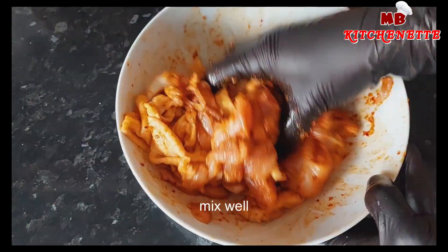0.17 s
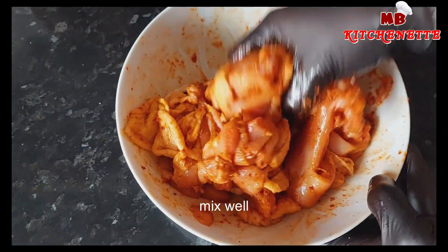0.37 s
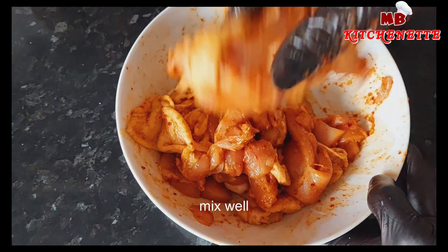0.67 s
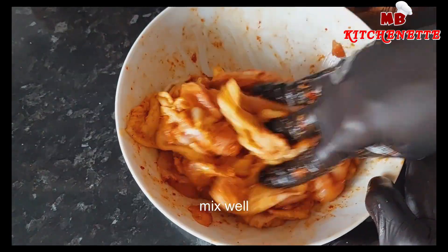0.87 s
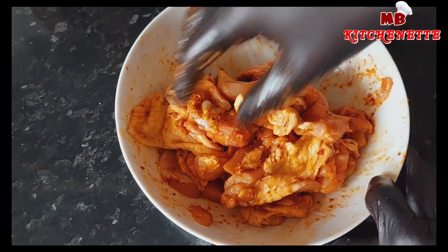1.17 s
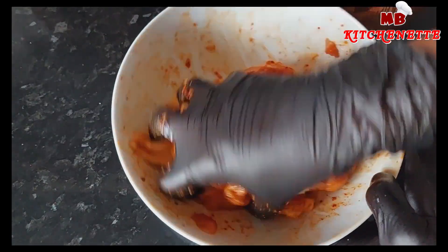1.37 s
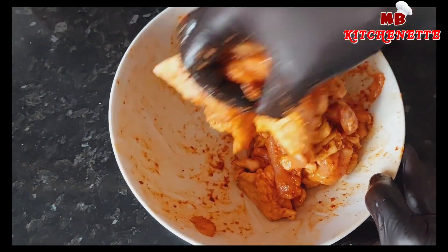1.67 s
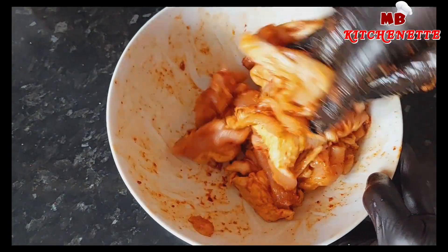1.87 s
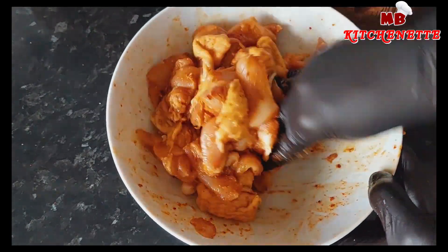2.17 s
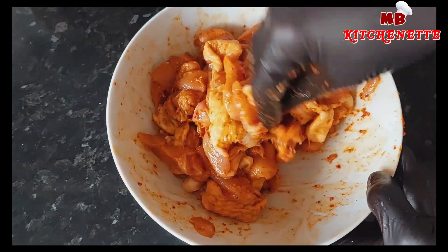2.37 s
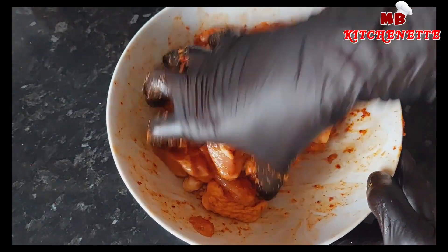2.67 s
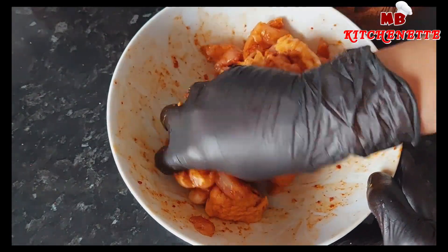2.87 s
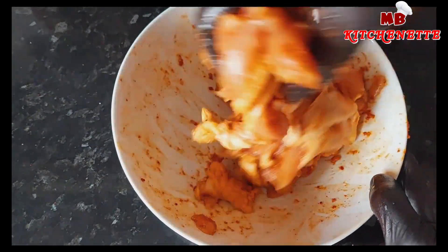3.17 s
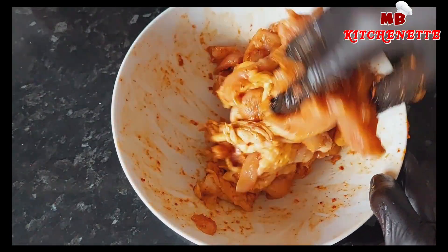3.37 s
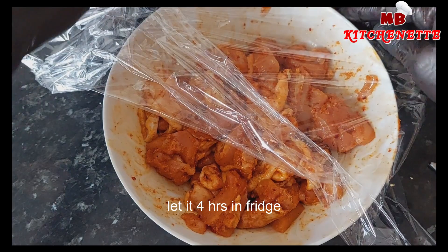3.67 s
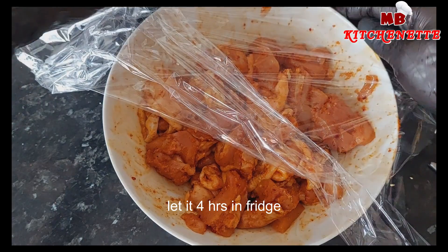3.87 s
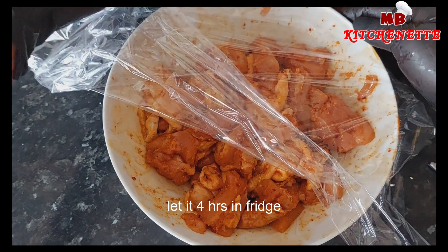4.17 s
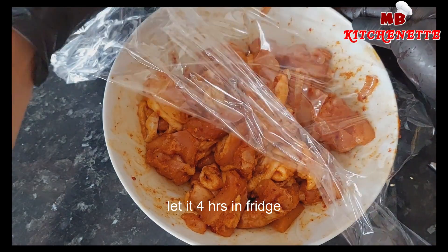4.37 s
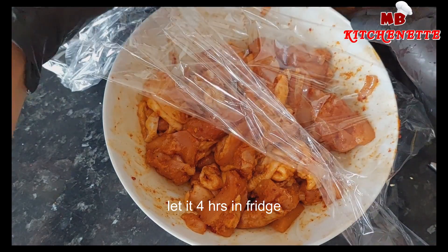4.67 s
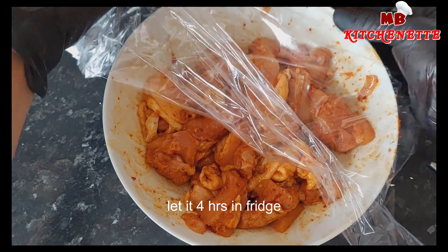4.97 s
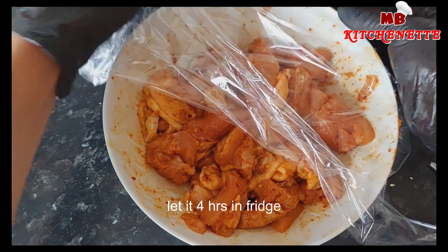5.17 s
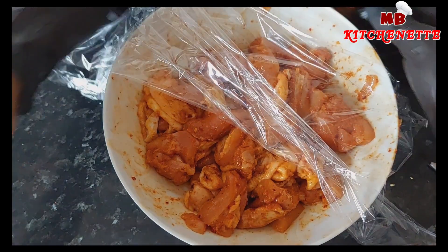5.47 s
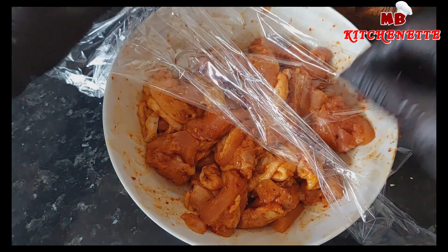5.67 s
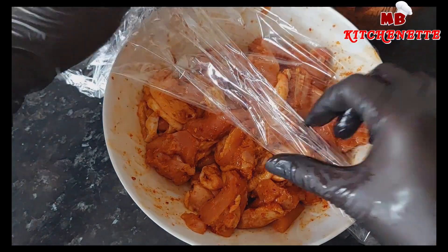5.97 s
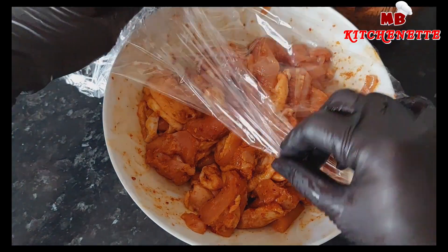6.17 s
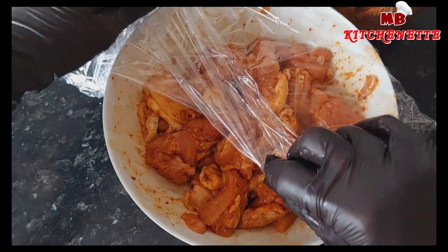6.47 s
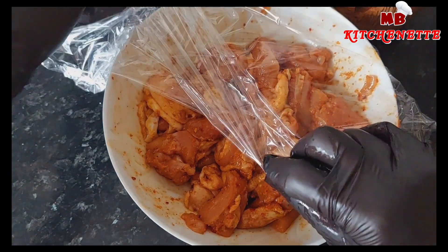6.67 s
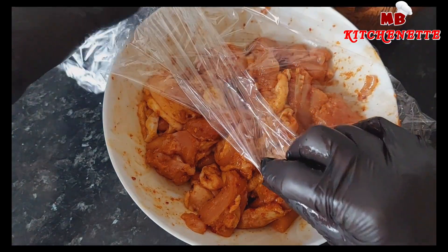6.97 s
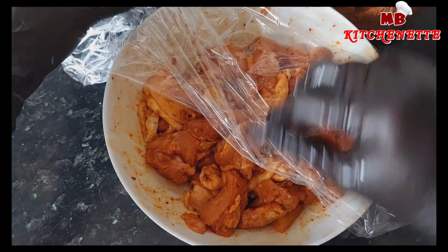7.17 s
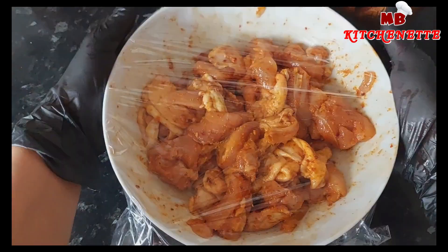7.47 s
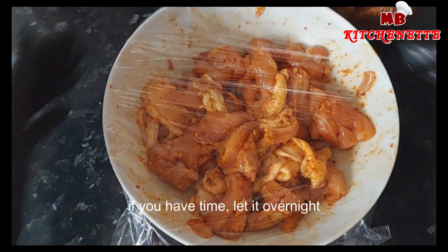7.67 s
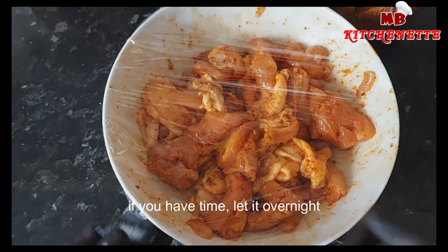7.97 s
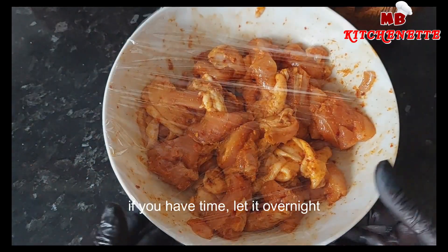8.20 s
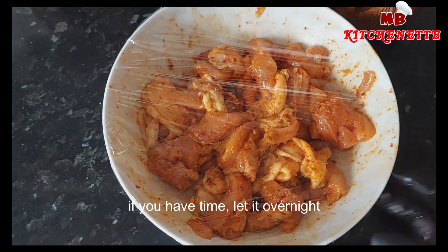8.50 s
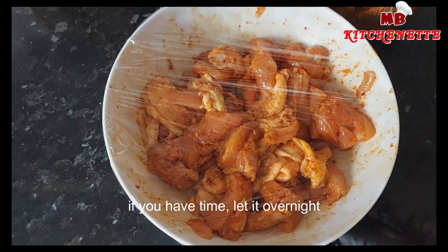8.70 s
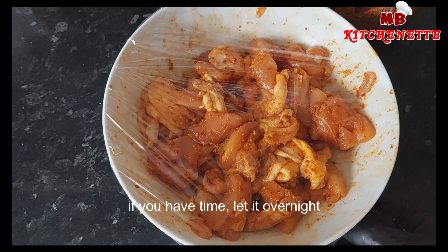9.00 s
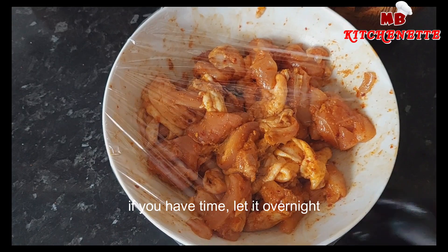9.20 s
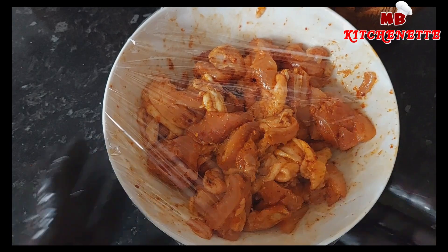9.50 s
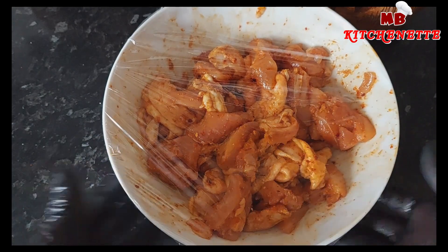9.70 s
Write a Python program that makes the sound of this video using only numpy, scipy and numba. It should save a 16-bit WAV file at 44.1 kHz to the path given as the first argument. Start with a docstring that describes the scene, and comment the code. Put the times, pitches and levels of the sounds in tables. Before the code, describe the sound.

Close stereo pickup in a small, quiet kitchen. First, sticky meat is kneaded in short irregular squishes, with fizzing marinade, popping air pockets and dull knocks ringing the bowl. The wet sound stops suddenly and plastic film takes over: faint creaks, bursts of brittle crackle, loud snaps, then smoother hissing rubs with a hollow, drum-like edge and a few muffled bowl bumps over low background noise.

```python
"""Gloved hands squish marinated chicken in a ceramic bowl: torn noise and tiny rings fizz, moving band-passes
squelch, pockets pop, and struck bowl modes with a filtered splat thud as the meat drops back in.
After a cut to a second shot, cling film is pulled over the bowl and smoothed down: noise bursts crinkle,
larger creases snap, and resonances that follow the tension make the taut sheet answer like a small drum.
A close stereo microphone hears it in a quiet, hard-walled kitchen, over low room noise and hiss."""
import sys
import numpy as np
from scipy import signal
from scipy.fft import rfft, irfft, next_fast_len
from scipy.io import wavfile
from scipy.ndimage import uniform_filter1d
from numba import njit

SR = 44100
rng = np.random.default_rng(int(sys.argv[2]) if len(sys.argv) > 2 else 0)


def output_pcm(signal):
    """Save a mono or channel-first signal as 16-bit PCM at the path in sys.argv[1].

    Samples are clipped to [-1, 1] before scaling.
    """
    pcm = np.clip(np.atleast_2d(signal).T, -1, 1) * 32767
    wavfile.write(sys.argv[1], SR, np.round(pcm).astype(np.int16))


N = 433944

CUT_S = 3.47  # the cut from the meat shot to the film shot is complete
# How fast the sound settles once the hand stops, in dB per second.
MEAT_RELEASE_DB_PER_S, FILM_RELEASE_DB_PER_S, BOWL_RELEASE_DB_PER_S = 202.5, 177, 98.5
FILM_REST_DB = -77  # the stretched film creeps faintly between pulls
BODY_GROWS = 1.4  # exponent: pockets and sheet swell and fade faster than the treble
TOP_HZ = 16100  # band limit of the recorder


def amp(db):
    """Decibels to gain."""
    return 10 ** (np.asarray(db) / 20)


def unit(x):
    """Scale to rms 1."""
    return x / np.sqrt(np.mean(x ** 2) + 1e-20)


def along(points, hz):
    """Read (Hz, value) points on a log frequency axis."""
    point_hz, value = np.transpose(points)
    return np.interp(np.log(hz + 1), np.log(point_hz + 1), value)


def filtered(x, response):
    """Multiply the spectrum of x by a response of frequency."""
    n = x.shape[-1]
    padded = next_fast_len(n + 8192)
    hz = np.fft.rfftfreq(padded, 1 / SR)
    return irfft(rfft(x, padded) * response(hz), padded)[..., :n]


def coloured(x, spectrum):
    """Shape x with a spectrum in dB, at rms 1."""
    return unit(filtered(x, lambda hz: amp(along(spectrum, hz))))


def noise(side_db, size=N):
    """White stereo noise; the side level sets how wide it is."""
    mid, side = rng.standard_normal((2, size)) * amp([[0], [side_db]])
    return unit(np.array([mid + side, mid - side]))


def add(track, s, sound):
    """Mix a sound into the track at s seconds."""
    part = track[:, round(s * SR):][:, :sound.shape[-1]]
    part += sound[..., :part.shape[-1]]


def ring(modes, t, scatter):
    """Struck modes decay; each reaches the two ports with its own strength and phase."""
    total = 0
    for hz, db, t60 in modes:
        level = amp(db + rng.normal(0, 1.5, (2, 1)) - 60 * t / t60)
        phase = rng.uniform(0, 2 * np.pi) + rng.normal(0, scatter, (2, 1))
        total = total + level * np.sin(2 * np.pi * hz * t + phase)
    return total


def bursts(rate, life, spread_db):
    """Level of a crackle: abrupt bursts that die at once, a few large among many small; even on average."""
    when, strength = rng.random((int(rate * N / SR), 2)).T
    energy = amp(spread_db * np.minimum(-np.log(1 - strength), 4)) ** 2
    impulses = np.bincount((when * N).astype(int), energy, N)
    power = signal.lfilter([1], [1, -np.exp(-2 / (life * SR))], impulses)
    average = np.abs(uniform_filter1d(power, SR // 25))
    return np.sqrt(power / (average + 1e-3))


def bubbles(rate, low_hz, high_hz, life, spread_db, size):
    """Tiny cavities ring as they open, each with its own path to the two ports."""
    when, pitch, strength = rng.random((int(rate * N / SR), 3)).T[:, :, None]
    hz = low_hz * (high_hz / low_hz) ** pitch
    height = amp(spread_db * np.minimum(-np.log(1 - strength), 4))
    index = ((when * N).astype(int) + np.arange(size)).ravel()
    ports = []
    for _ in range(2):
        delay_s = .0004 * rng.random(hz.shape)
        age = np.maximum(np.arange(size) / SR - delay_s, 0)
        waves = height * np.exp(-age / life) * np.sin(2 * np.pi * hz * age)
        ports.append(np.bincount(index, waves.ravel(), N)[:N])
    return unit(np.array(ports))


def patchy(x, depth_db, size, count):
    """Each spot has its own colour: random gain smoothed over size frequency bins and count frames."""
    z = signal.stft(x, nperseg=256)[2]
    field = uniform_filter1d(rng.standard_normal(z.shape[1:]), size, 0)
    field = uniform_filter1d(field, count, 1)
    return signal.istft(z * amp(depth_db * unit(field)), nperseg=256)[1][:, :N]


@njit
def resonate(x, hz, q):
    """A stereo band-pass whose centre moves."""
    out = np.zeros_like(x)
    step = 2 * np.sin(np.pi * hz / SR)
    for port in range(2):
        low = band = 0.0
        for i in range(x.shape[1]):
            low += step[i] * band
            band += step[i] * (x[port, i] - low - band / q)
            out[port, i] = band / q
    return out


def stroke(start, rise, hold, release_db_per_s):
    """Effort of one hand movement: it builds up, holds and dies away."""
    t = np.arange(N) / SR - start
    build = np.clip(t / max(rise, 1e-3), 0, 1)
    return build * amp(-np.clip((t - rise - hold) * release_db_per_s, 0, 120))


def handling(strokes, release_db_per_s, rest, uneven_db, catches_per_s, slip_s):
    """Gains of treble and body over all strokes; at random the fingers catch: the effort jumps and slips away."""
    treble, body = rest ** 2, 0  # powers
    for start, rise, hold, db, body_db, *_ in strokes:
        effort = stroke(start, rise, hold, release_db_per_s)
        treble = treble + (amp(db) * effort) ** 2
        body = body + (amp(db + body_db) * effort ** BODY_GROWS) ** 2
    catches = rng.random(N) < catches_per_s / SR
    grip = signal.lfilter([1], [1, -np.exp(-1 / (slip_s * SR))], catches * 1.0)
    unevenness = amp(uneven_db * np.minimum(unit(grip - grip.mean()), 3))
    return np.sqrt([treble, body]) * unevenness


def film_shot():
    """0 during the meat shot, 1 during the film shot, with a 20 ms crossing at the cut."""
    return np.clip((np.arange(N) / SR - CUT_S) / .02 + 1, 0, 1)


def kitchen(x, wet_db):
    """The direct sound plus the hard walls' answer, in which treble dies first."""
    # Decay of the room. Each row: frequency in Hz, t60 in seconds.
    room_decay = [(100, 0.35), (500, 0.44), (1500, 0.36), (5000, 0.16), (14000, 0.13)]
    hz, t, z = signal.stft(noise(-4.5, size=SR * 2 // 3), SR, nperseg=256)
    decay = amp(-60 * t / along(room_decay, hz)[:, None])
    build = 1 - np.exp(-t / 0.0018)
    tail = signal.istft(z * decay * build, SR, nperseg=256)[1]
    tail = tail / np.linalg.norm(tail[0])
    return x + amp(wet_db) * signal.fftconvolve(x, tail, axes=1)[:, :N]


def background():
    """Low room noise and microphone hiss, each steady noise of one colour."""
    # Colour of the room noise. Each row: frequency in Hz, relative level in dB.
    air_colour = [(21, -28.5), (35, 4), (124, 3), (200, -9), (260, -2.5), (600, -5.5), (700, -13.5),
                  (1400, -24), (2400, -70.5)]
    # Colour of the microphone hiss. Each row: frequency in Hz, relative level in dB.
    hiss_colour = [(1000, -10), (2000, -3), (3600, -12.5), (5500, -3), (9000, 0), (16000, 0)]
    air = amp(-66.5) * coloured(noise(-2.5), air_colour)
    return air + amp(-70.0) * coloured(noise(-1), hiss_colour)


def shifting():
    """The bowl rumbles faintly as the film is tucked under it; once a puff of air thumps the left port."""
    # The bowl shifts on the counter.
    # Each row: start in seconds, rise in seconds, hold in seconds, rumble level in dB.
    bowl_moves = [(7.399, 0.045, 0.14, -64), (7.57, 0.012, 0.033, -56.5), (7.979, 0.01, .02, -47.5),
                  (8.04, 0.018, 0.064, -60), (8.4, 0.092, 0.39, -63), (9.041, 0.097, 0.77, -66.5)]
    # Colour of the rumble. Each row: frequency in Hz, relative level in dB.
    rumble_colour = [(25, -4), (48, -4.5), (100, -1), (180, -10.5), (400, -15), (900, -47.5)]
    power = 0
    for start, rise, hold, db in bowl_moves:
        power = power + (amp(db) * stroke(start, rise, hold, BOWL_RELEASE_DB_PER_S)) ** 2
    rumble = np.sqrt(power) * coloured(noise(0), rumble_colour)
    t = np.arange(N) / SR - 7.605  # seconds from the middle of the puff
    puff = amp(-38) * np.exp(-np.abs(t) / 0.015) * np.sin(2 * np.pi * 62 * t)
    return rumble + puff * np.array([[1], [0]])


def crinkling():
    """Slack film buckles in small creases, taut film mostly hisses under the gloves; the sheet adds a hollow body."""
    # The hands pull, tuck or smooth the film. Each row: start in seconds, rise in seconds,
    # hold in seconds, crinkle level in dB, taut sheet in dB relative to the crinkle.
    film_moves = [(3.53, 0.035, 0.11, -65.5, -4.5), (3.68, 0.05, 0.63, -71, -10),
                  (4.12, 0.012, 0.21, -54, -6.5), (4.2, 0.03, 0, -49, -5), (4.4, 0.057, 0, -60, -11.5),
                  (4.722, 0.012, 0.03, -56.5, -3), (4.82, 0.033, 0.3, -61, -8.5),
                  (5.04, 0.046, .025, -44.5, -5), (5.13, 0.013, 0.04, -49.5, 1),
                  (5.21, 0.034, 0.11, -56, -3), (5.36, 0.026, .11, -66.5, -7.5),
                  (5.71, 0.061, 0.033, -58, -9), (6.005, 0.032, .07, -50, -9.5),
                  (6.11, 0.081, .05, -46.5, -6.5), (6.235, 0.015, 0, -42, -6.5),
                  (6.35, .03, .08, -62.5, -9), (6.48, .02, 0.092, -60, -4), (6.75, 0.027, .03, -62, -11.5),
                  (6.87, 0.022, 0.11, -61.5, -15), (6.97, 0.061, 0.055, -48, -7.5),
                  (7.16, 0.013, 0, -58.5, -4), (7.41, 0.022, 0.14, -55, -10.5),
                  (7.91, 0.075, 0.22, -55.5, -4.5), (8.04, 0.019, .06, -47.5, -6),
                  (8.25, 0.025, 0, -51, -2.5), (8.51, 0.046, .05, -58, -13.5),
                  (8.62, 0.035, 0.16, -50.5, -4), (8.88, 0.078, .06, -55, -5),
                  (9.04, 0.0295, 0.067, -65, -4), (9.16, 0.01, 0, -55, -6.5), (9.43, 0.1, 0.18, -49, -9.5)]
    # The film is pulled tight, so creases give way to smooth sliding.
    # Each row: time in seconds, share of the sound's power made by creases (0-1).
    slack_curve = [(6.9, .8), (7.5, .4)]
    # The film's resonance follows how tight it is pulled. Each row: time in seconds, pitch in Hz.
    tension_curve = [(4.3, 1085), (5.25, 956), (6.25, 1350), (6.55, 940), (7.1, 981), (8.1, 1300),
                     (8.8, 1360)]
    # Colour of the crinkle. Each row: frequency in Hz, relative level in dB.
    crinkle_colour = [(1000, -23), (1800, -7.5), (3300, -4.5), (4100, -1), (6500, -3), (12000, 0),
                      (16000, -2.5)]
    # Colour of the hollow sheet. Each row: frequency in Hz, relative level in dB.
    drum_colour = [(80, -6), (300, -4.5), (680, -6.5), (1400, -9.5), (2600, -11.5), (4500, -21)]
    t = np.arange(N) / SR
    creep = amp(FILM_REST_DB) * film_shot()
    crinkle, sheet = handling(film_moves, FILM_RELEASE_DB_PER_S, creep,
                              uneven_db=1.54, catches_per_s=36, slip_s=0.025)
    slack = np.interp(t, *np.transpose(slack_curve))
    small = bursts(rate=400, life=.0024, spread_db=2.8)
    large = bursts(rate=50, life=.0013, spread_db=2.2)
    creases = unit(np.hypot(small, .95 * large))
    friction = np.sqrt(slack * creases ** 2 + 1 - slack)  # creases and smooth sliding share the power
    bright = patchy(friction * noise(0), 2, size=24, count=2)
    rubbed = friction * noise(-2.2)
    sheet_hz = np.interp(t, *np.transpose(tension_curve))
    hollow = rubbed + amp(8) * resonate(rubbed, sheet_hz, 3)
    treble = amp(0.38) * crinkle * coloured(bright, crinkle_colour)
    return treble + amp(1.35) * sheet * coloured(hollow, drum_colour)


def snaps():
    """A large crease flips with a crack, shakes its neighbours and rings the taut sheet."""
    # Creases snap through. Each row: time in seconds, level in dB, relative level of the sheet's ring in dB.
    crease_snaps = [(4.062, -38, -20.5), (4.145, -25.5, -10), (4.2389, -19, -21), (4.243, -23, -5),
                    (4.305, -21.5, -6.5), (4.333, -28.5, -28), (4.995, -33.5, -15), (5.090, -23.5, -19),
                    (5.099, -24.5, -21), (5.112, -23.5, -18), (5.117, -24, -26), (5.137, -32.5, -18),
                    (5.160, -33.5, 0.5), (5.193, -36.5, 3), (6.13, -35.5, -22), (6.15, -29, -19),
                    (6.162, -27, -10), (6.187, -27.5, -8), (6.248, -14.5, -27), (6.2547, -13, -22),
                    (6.484, -37.5, -7), (7.051, -30.5, -34), (7.934, -39, -14), (8.061, -37, -13),
                    (8.756, -24.5, -8), (8.824, -26.5, -6), (8.9086, -21, -0.5)]
    # Modes of the taut film. Each row: frequency in Hz, relative level in dB, t60 in seconds.
    sheet_modes = [(560, -11, 0.018), (1036, -2, 0.024), (1367, 2, 0.018)]
    out, t = np.zeros((2, N)), np.arange(SR // 20) / SR
    onset = 1 - np.exp(-t / .0001)
    for s, db, ring_db in crease_snaps:
        # the crack itself, then the fainter neighbours
        fade = (amp(-60 * t / .008) + amp(-21 - 60 * t / .05)) * onset
        crack = filtered(fade * noise(0, size=len(t)),
                         lambda hz: hz ** 2 / (hz ** 2 - 1100 ** 2 - 1300j * hz))
        drum = ring(sheet_modes, t, scatter=0.34) * onset
        add(out, s, amp(db) * (amp(-7.5) * crack + amp(ring_db - 9.0) * drum))
    return out


def drops():
    """Soft meat knocks the bowl's modes; a flat landing also slaps the air out from under it."""
    # Meat lands in the bowl. Each row: time in seconds, level in dB, contact cut-off in Hz,
    # relative level of the slap in dB, relative level of the low push in dB.
    landings = [(0.1193, -36, 650, -2, -23), (0.127, -30.5, 297, -20, 3), (1.266, -33.5, 360, -27, -27),
                (1.3194, -23.5, 450, -2.5, -18), (1.331, -25.5, 220, -22, -11),
                (2.0708, -20, 1290, 18.5, -13.5), (2.094, -22, 950, 9, -4), (2.658, -34, 480, -17, -22),
                (2.701, -22.5, 304, -17, -4.5)]
    # Modes of the loaded bowl on the counter. Each row: frequency in Hz, relative level in dB, t60 in seconds.
    bowl_modes = [(107, 1, 0.17), (145.7, -6, 0.2), (231, -9.5, .24), (301, -11, 0.39), (381, -9, 0.24),
                  (497.8, -2.5, .22), (557, -5.5, 0.25), (690, 0, 0.19), (811, -8, 0.25),
                  (984.3, -4.5, .23), (1218, -10, 0.3)]
    out, t = np.zeros((2, N)), np.arange(SR // 2) / SR
    for s, db, contact_hz, slap_db, push_db in landings:
        body = amp(-11.0) * ring(bowl_modes, t, scatter=0.41)
        fade = amp(10 - 60 * t / 0.125) + amp(-7.5 - 60 * t / .36)
        splat = filtered(fade * noise(-5.5, size=len(t)),
                         lambda hz: 1j * hz / (220 + 1j * hz) / (1 + (hz / 2300) ** 2))
        settle = 1 - np.exp(-t * contact_hz / 0.39)  # a soft contact takes longer to build up
        # the knock carries little deep bass
        blow = filtered((body + splat) * settle, lambda hz: hz ** 2 / (hz ** 2 - 100 ** 2 - 95j * hz))
        push = amp(push_db - 60 * t / 0.05) * np.sin(2 * np.pi * 100 * t)
        # a soft contact dulls the knock
        knock = filtered(blow + push, lambda hz: 1 / (1 + 1.4j * hz / contact_hz - (hz / contact_hz) ** 2))
        ports = np.array([[.4], [-.4]])  # phase in radians
        cavity = np.sin(2 * np.pi * 750 * t + ports)
        cavity = cavity + amp(-13.0) * np.sin(2 * np.pi * 1300 * t - ports)
        swell = t / 0.00079
        slap = amp(slap_db - 7) * swell * np.exp(1 - swell) * cavity
        add(out, s, amp(db) * (knock + slap * amp([[1.5], [-1.5]])))
    return out


def pops():
    """A sticky pocket bursts: a sharp tick and a brief ring of its cavity, longer when it is large."""
    # Pockets pop open. Each row: time in seconds, level in dB, pitch in Hz.
    pocket_pops = [(0.197, -33, 1280), (.231, -31, 2970), (0.2422, -33, 2920), (.281, -23.5, 3580),
                   (.319, -29.5, 1570), (.3234, -30, 2300), (.395, -24, 6750), (.663, -40.5, 5450),
                   (0.792, -32, 5280), (0.8215, -25.5, 4850), (0.84, -33.5, 2380), (0.898, -34.5, 4160),
                   (1, -31.5, 12230), (1.3204, -28, 13100), (1.371, -19, 10720), (1.377, -25.5, 12170),
                   (1.4015, -28, 6200), (1.451, -24.5, 3994), (1.4857, -33.5, 1560), (1.548, -31.5, 2080),
                   (1.69, -35, 2170), (1.938, -37, 2440), (1.982, -31, 2760), (2.044, -30.5, 5600),
                   (2.107, -27.5, 7880), (2.175, -29, 2700), (2.7395, -28, 2400), (2.84, -28.5, 1900),
                   (2.878, -32, 1400), (2.926, -29, 1980), (2.961, -24, 5200), (2.991, -27, 2500),
                   (3.041, -30.5, 5060), (3.344, -38, 6370), (3.427, -37.5, 1130)]
    out, t = np.zeros((2, N)), np.arange(SR // 40) / SR
    for s, db, hz in pocket_pops:
        fade = amp(-60 * t / .003) + amp(-16 - 60 * t / .02)
        # a broad band around the pitch
        tick = filtered(fade * noise(-1, size=len(t)),
                        lambda f: 1j * f / (hz / 3 + 1j * f) / (1 + .5j * f / hz))
        cavity = ring([(hz, 0, .003 + 10 / hz)], t, scatter=.7)
        add(out, s, amp(db) * (amp(-5) * tick + amp(-5) * cavity))
    return out


def kneading():
    """Marinade tears in tiny clicks while air pockets squelch one after another, each at its own pitch."""
    # The hand squeezes or lifts the meat. Each row: start in seconds, rise in seconds, hold in seconds,
    # fizz of the marinade in dB, squelch of air pockets in dB relative to the fizz, their usual pitch in Hz.
    squeezes = [(0.087, 0.046, 0.11, -52.5, 2.5, 1530), (0.265, 0.018, 0.026, -49.5, 2.5, 2120),
                (0.328, 0.029, 0.013, -50.5, -30, 3020), (0.493, 0.12, 0.18, -60.5, -14, 4800),
                (0.754, 0.075, 0.027, -50.5, 1, 2060), (0.883, 0.017, 0.04, -52.5, -1, 3930),
                (1.319, 0.06, 0.21, -46, -2.5, 1870), (1.64, 0.013, 0.023, -50, -9, 2510),
                (1.718, 0.026, 0.036, -62.5, -1, 2160), (1.806, 0.033, 0.098, -56.5, -9.5, 3950),
                (1.937, 0.037, 0.21, -48.5, 3, 2090), (2.203, 0.018, 0.081, -56, -4, 2235),
                (2.666, 0.07, 0.28, -48.5, -2.5, 1570), (2.921, 0.031, 0.079, -47, -2.5, 3180),
                (3.069, 0.017, 0.1, -64.5, -6, 2100), (3.325, 0.064, 0.021, -46, -8, 2230),
                (3.38, 0.025, 0.022, -51, 6, 1753)]
    # Colour of the fizz. Each row: frequency in Hz, relative level in dB.
    fizz_colour = [(1400, -10.5), (2500, -8), (5500, -3.5), (9500, -4), (12500, 1.5), (16000, -5.5)]
    # Colour of the squelch. Each row: frequency in Hz, relative level in dB.
    squelch_colour = [(400, -23.5), (950, 1), (4500, -6), (9000, -22)]
    fizz, pockets = handling(squeezes, MEAT_RELEASE_DB_PER_S, amp(-75.5),
                             uneven_db=3.0, catches_per_s=31, slip_s=0.0083)
    small = bursts(rate=600, life=.0012, spread_db=2.8)
    sharp = bursts(rate=80, life=.0006, spread_db=3)
    tearing = np.hypot(small, .7 * sharp)
    tiny = bubbles(rate=1000, low_hz=3730, high_hz=14400, life=0.00055, spread_db=2.0, size=130)
    wet = patchy(tearing * noise(-1) + amp(-5) * tiny, 2, size=10, count=6)
    middle_s = [start + rise + hold / 2 for start, rise, hold, *_ in squeezes]
    usual_hz = np.interp(np.arange(N) / SR, middle_s, [row[-1] for row in squeezes])
    pocket = np.cumsum(rng.random(N) < 130 / SR)  # index of the open pocket, about 130 a second
    pitch = usual_hz * 2 ** rng.uniform(-.7, .7, N)[pocket]
    opening = bursts(rate=520, life=.0013, spread_db=2.4)
    # the square root offsets the wider band of a high pocket
    squelch = resonate(opening * noise(-1) / np.sqrt(pitch), pitch, 3.2)
    treble = amp(0.45) * fizz * coloured(wet, fizz_colour)
    return treble + amp(-3.5) * pockets * coloured(squelch, squelch_colour)


def scene():
    """A cut between two shots in the same kitchen: the meat sound and its echo break off, the film sound begins."""
    meat = kitchen(kneading() + pops(), wet_db=-10) * amp([[.3], [-.3]]) * (1 - film_shot())
    film = kitchen(crinkling(), wet_db=-12.0) + kitchen(snaps(), wet_db=-12.5)
    film = film * amp([[.5], [-.5]])
    return meat + film + kitchen(drops(), wet_db=-9.0) + shifting() + background()


def record(dry):
    """The close ports hear bass alike; the recorder drops the deepest rumble and all above its band limit."""
    mid = dry.mean(0)
    side = filtered(dry[0] - mid, lambda hz: (hz + 40) / np.hypot(hz + 40, 190))
    low_cut = signal.butter(3, 40, "highpass", fs=SR, output="sos")
    ports = signal.sosfilt(low_cut, np.array([mid + side, mid - side]))
    return filtered(ports, lambda hz: hz < TOP_HZ)


dry = scene()
out = record(dry)
output_pcm(out)
```